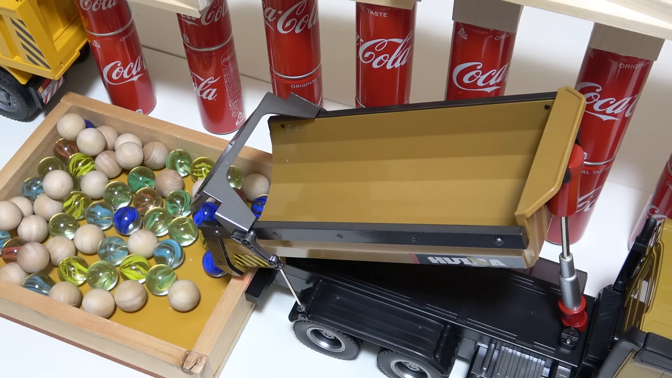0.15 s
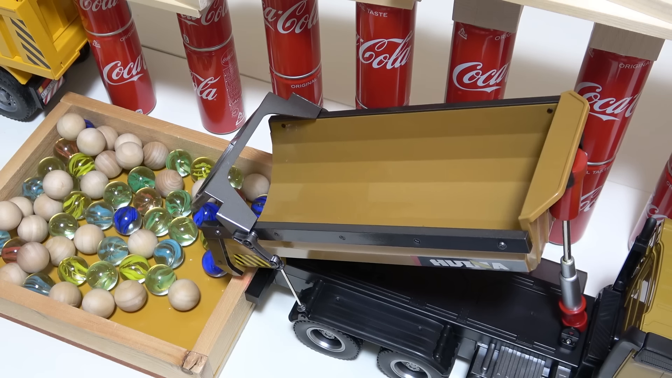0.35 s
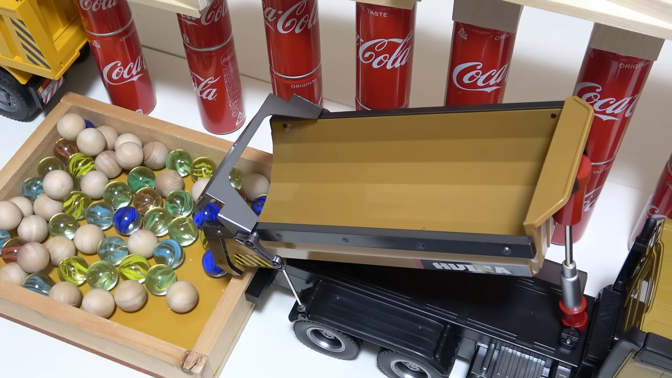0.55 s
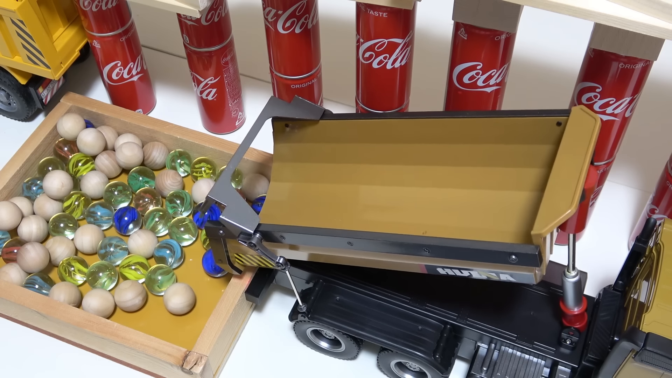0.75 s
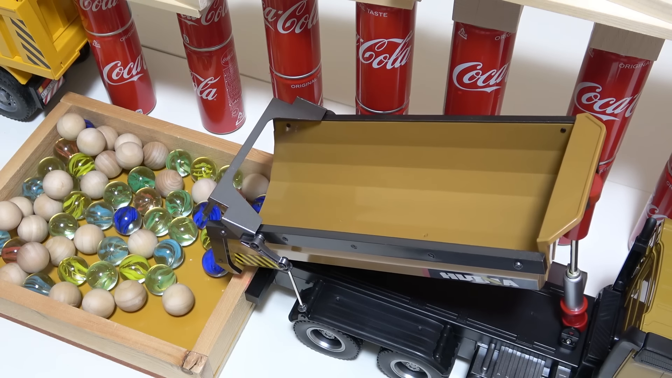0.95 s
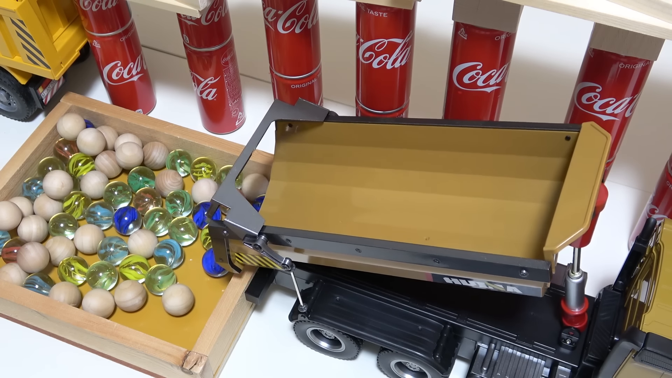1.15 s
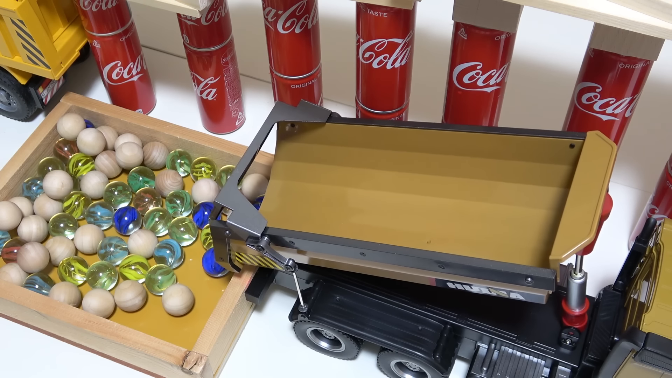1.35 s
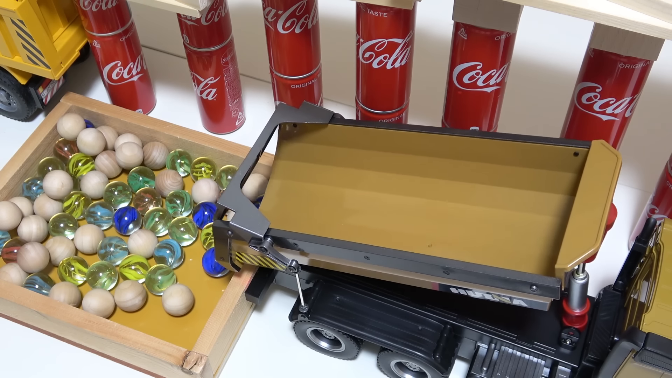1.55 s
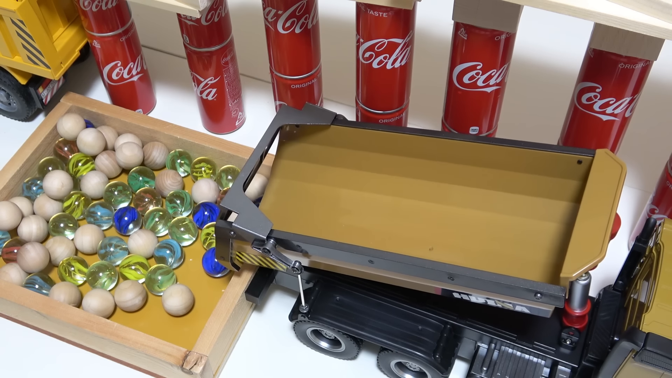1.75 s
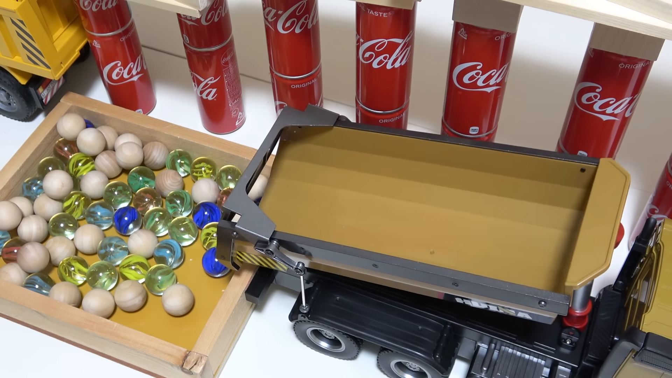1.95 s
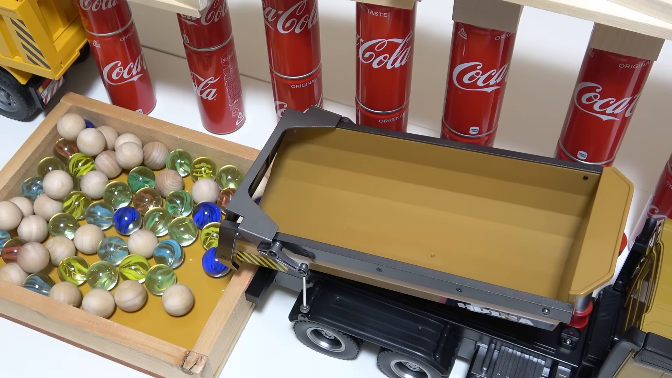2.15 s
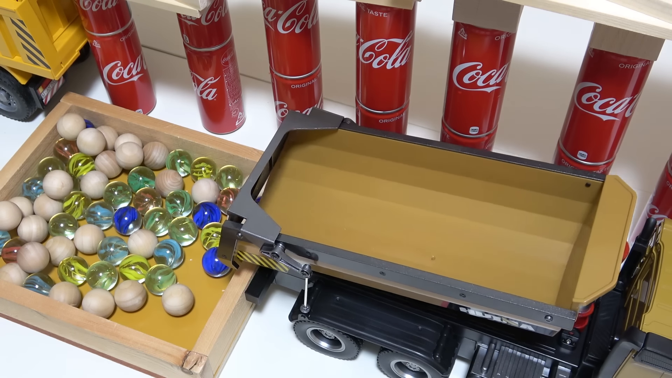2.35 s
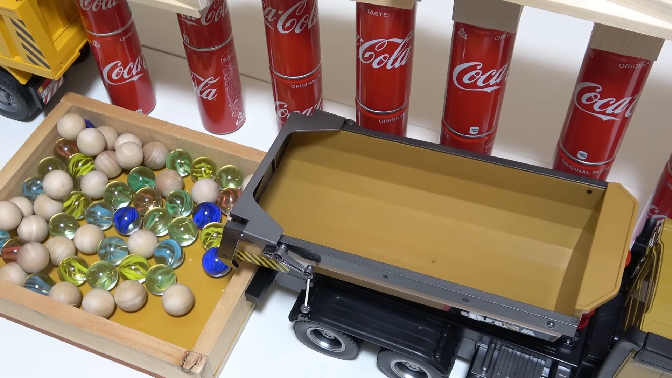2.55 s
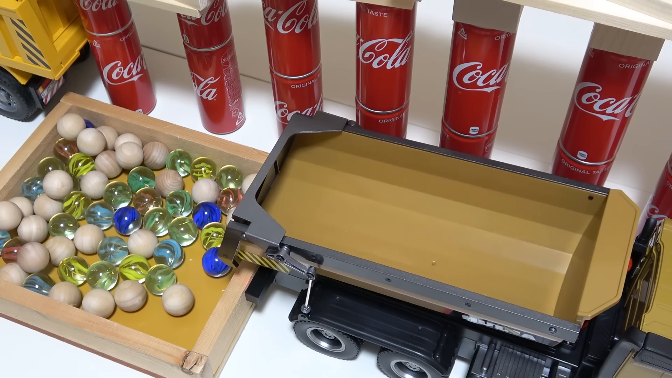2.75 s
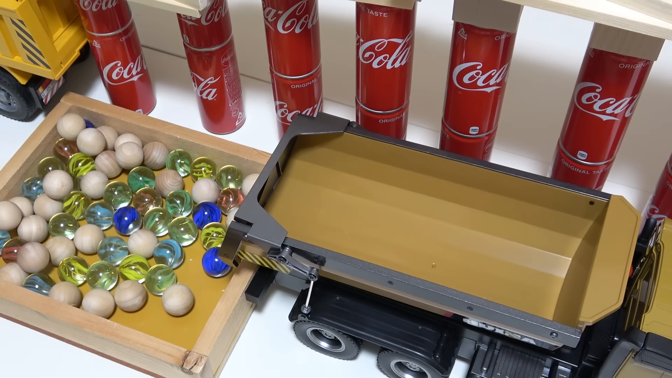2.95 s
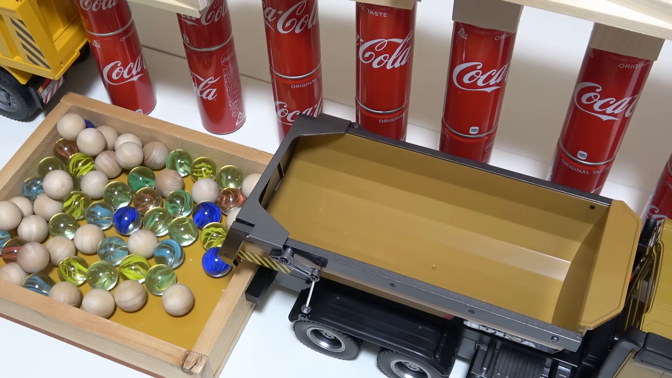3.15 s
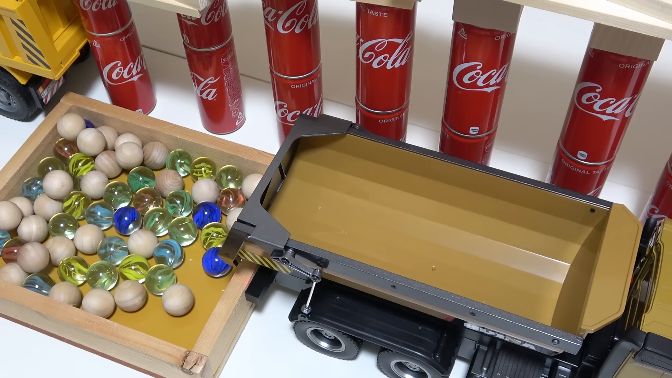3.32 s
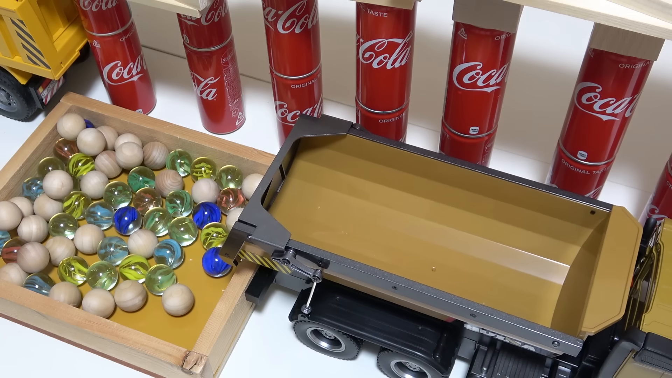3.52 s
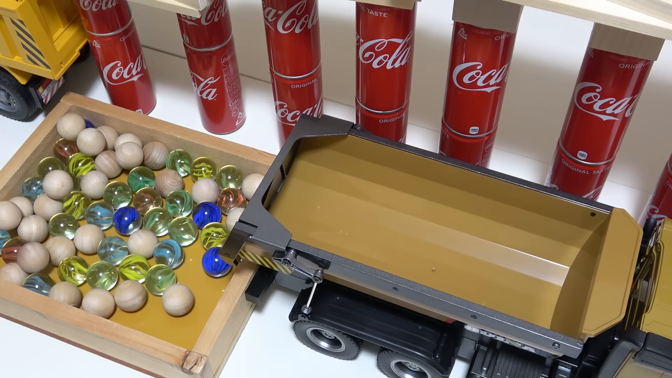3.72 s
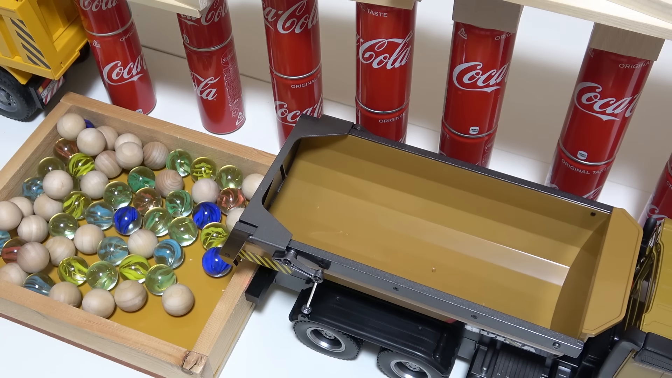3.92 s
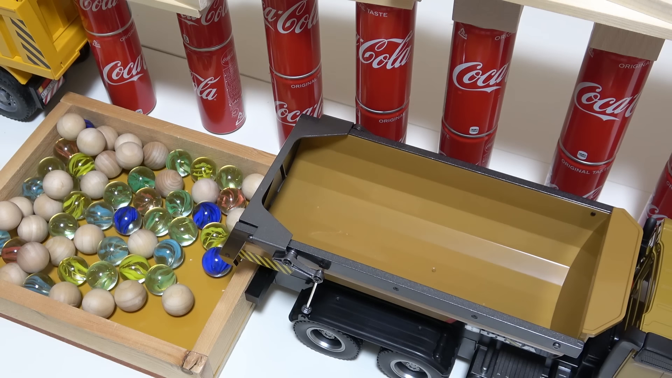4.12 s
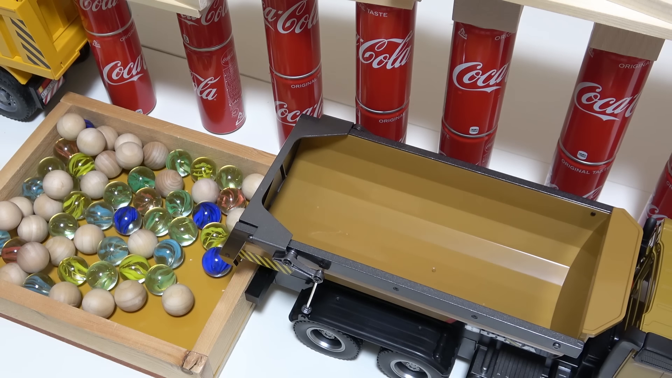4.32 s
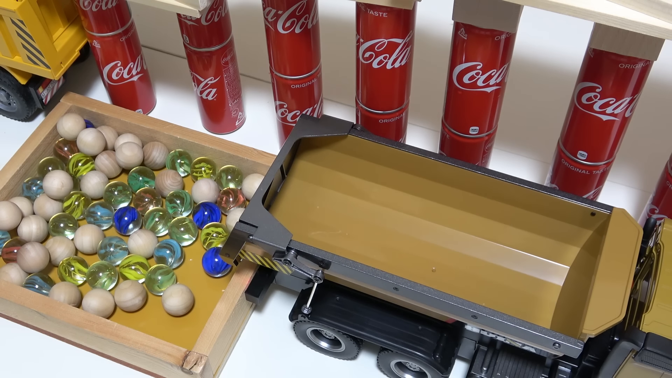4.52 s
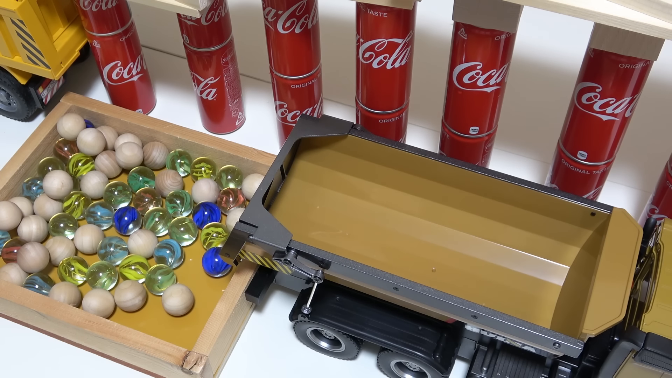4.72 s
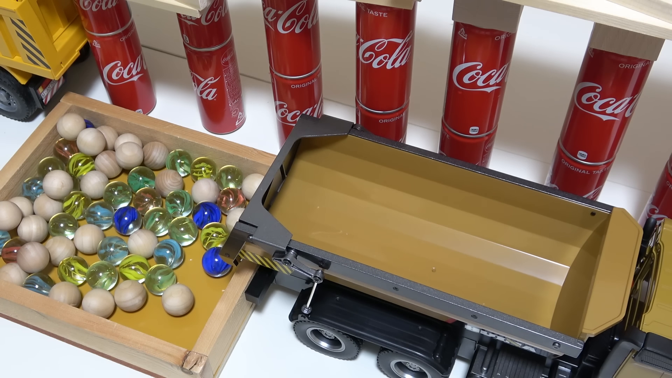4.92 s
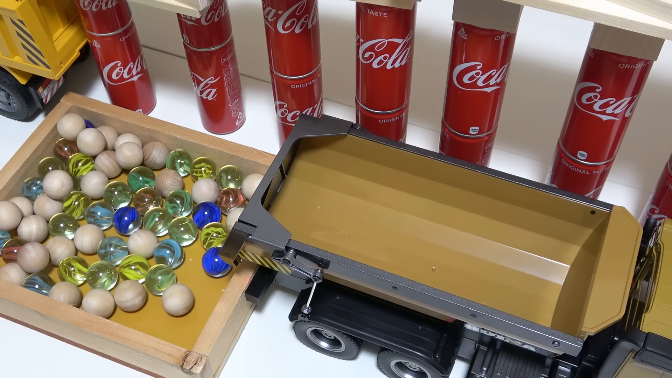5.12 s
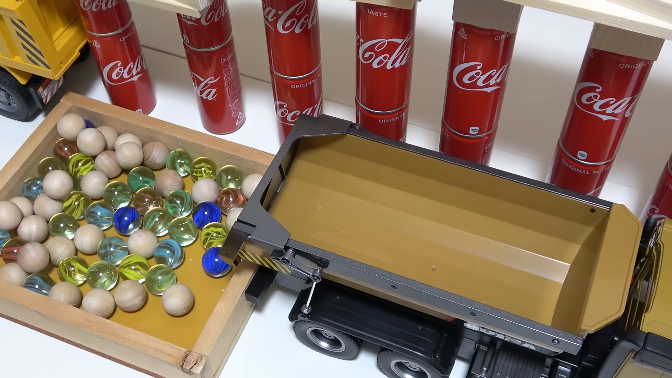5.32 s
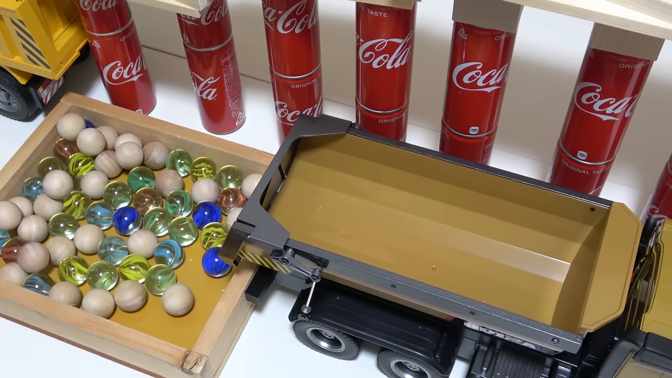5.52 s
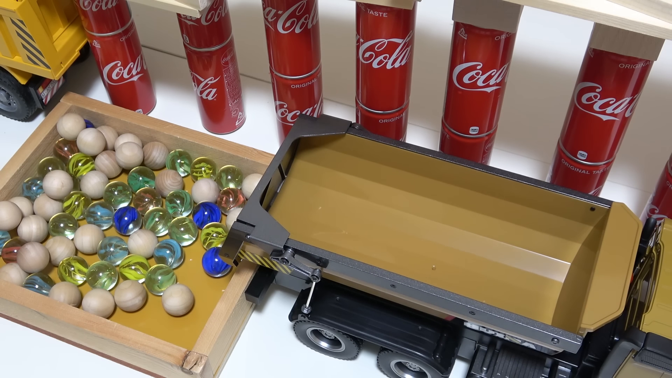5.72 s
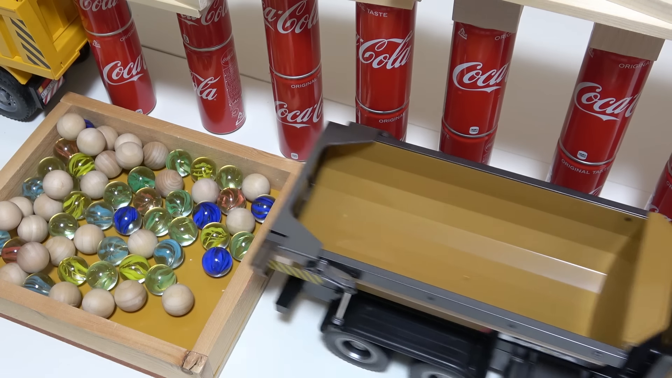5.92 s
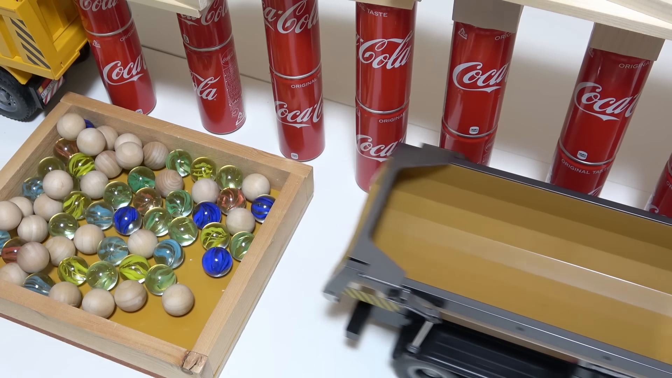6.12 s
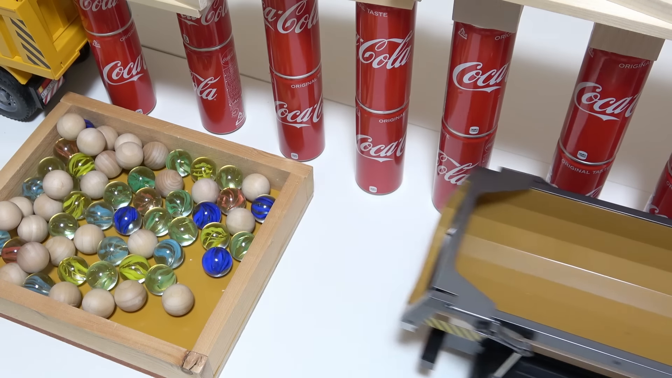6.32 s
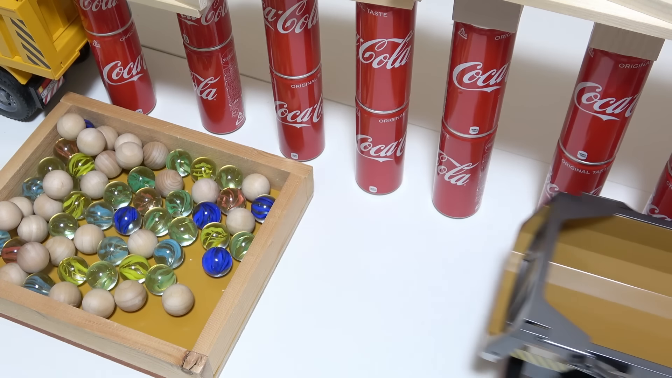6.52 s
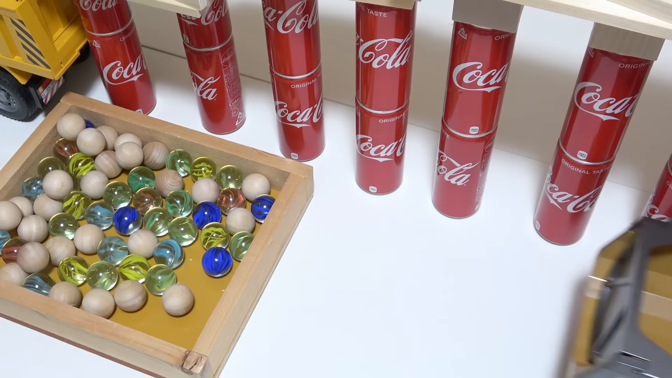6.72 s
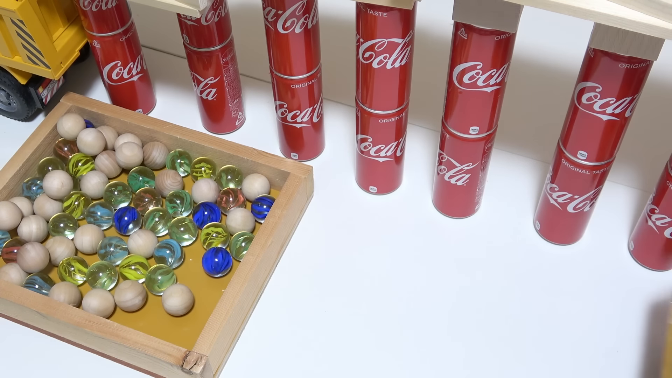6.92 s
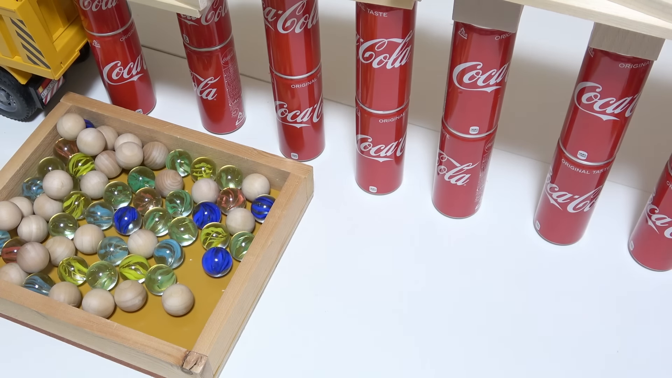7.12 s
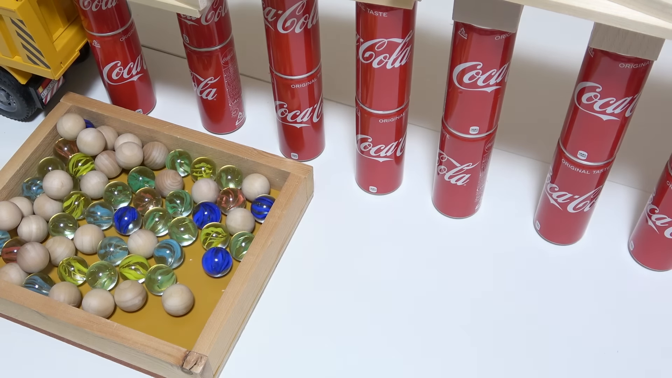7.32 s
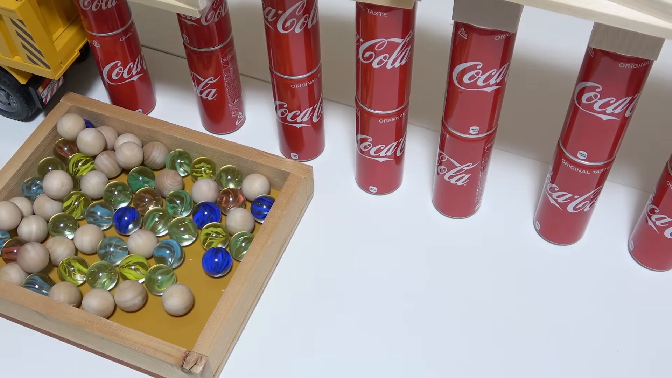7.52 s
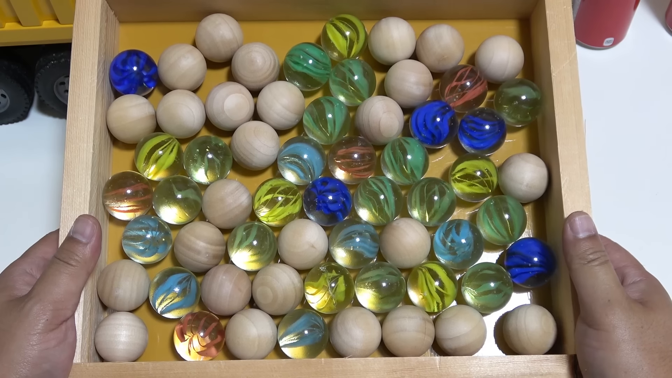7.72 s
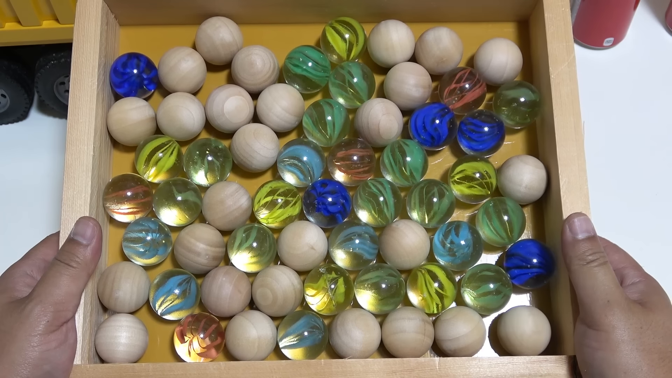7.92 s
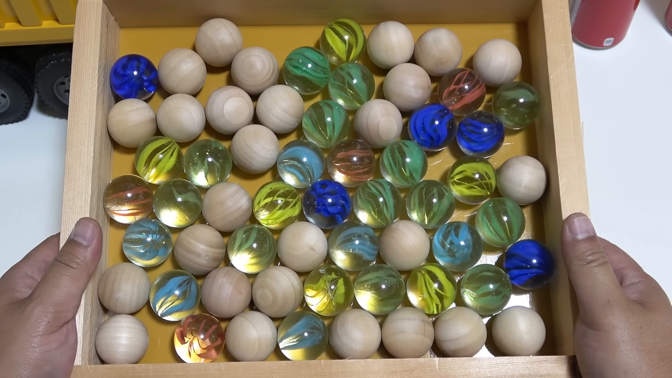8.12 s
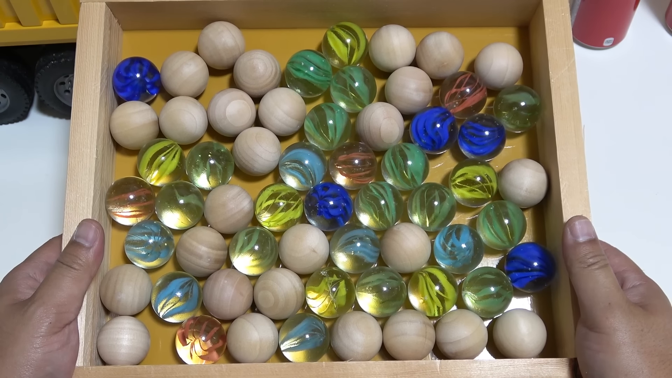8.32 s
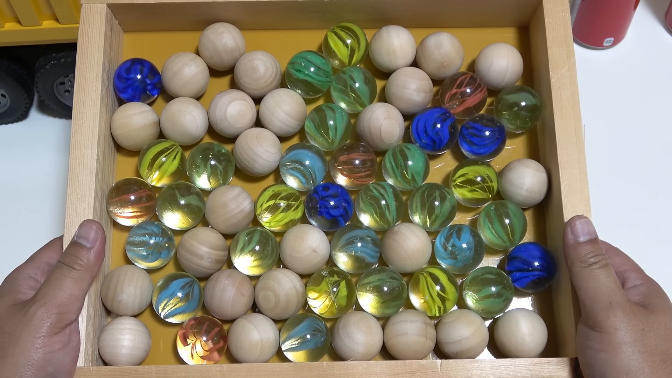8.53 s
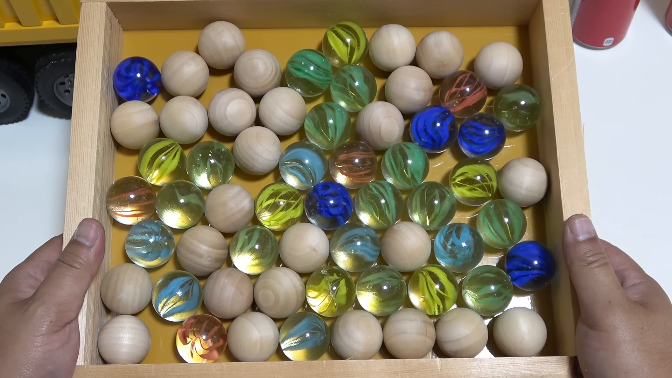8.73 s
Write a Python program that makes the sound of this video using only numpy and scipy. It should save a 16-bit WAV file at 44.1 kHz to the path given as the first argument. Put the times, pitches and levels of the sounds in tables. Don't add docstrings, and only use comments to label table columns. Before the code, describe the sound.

In a quiet room, wooden and glass balls settle with a few quick taps before an abrupt cut to a toy truck's lift motor. It whines steadily with gear hiss, the bed creaks and lands softly, and the motor coasts down. A harsher drive motor spins up, rattles away and ends in a clattering bump. Another cut leaves faint room hum. Close microphone, short echo.

```python
import sys
import numpy as np
from scipy import signal
from scipy.fft import rfft, irfft, next_fast_len
from scipy.io import wavfile
from scipy.ndimage import uniform_filter1d

SR = 44100
rng = np.random.default_rng(int(sys.argv[2]) if len(sys.argv) > 2 else 0)


def wav_out(sig):
    wavfile.write(sys.argv[1], SR, np.round(np.clip(np.atleast_2d(sig).T, -1, 1) * 32767).astype(np.int16))


def ratio(d):
    e = np.asarray(d, float) / 20
    return 10 ** e


N = 386316
T = np.arange(N) / SR

TRUCK_S, QUIET_S = 0.168, 7.608
OFF_S, COAST_S = 5.329, 0.51


def evened(x):
    return x / np.sqrt(np.mean(x ** 2) + 1e-20)


def read(points, hz):
    f, value = np.transpose(points)
    return np.interp(np.log(hz + 1), np.log(f + 1), value)


def play(rows):
    s, *columns = np.transpose(rows)
    gate = (T >= s[0]) * np.clip((s[-1] - T) / 0.0091, 0, 1)
    return [np.interp(T, s, c) for c in columns] + [gate]


def add(mix, s, sound):
    part = mix[round(s * SR):][:len(sound)]
    part += sound[:len(part)]


def hold(start, end, db, rise, fall):
    return db - rise * np.maximum(start - T, 0) - fall * np.maximum(T - end, 0)


def bell(s, width_s):
    return np.exp(-((T - s) / width_s) ** 2)


def travelled(raised_db, down_db, swell_db=0, at=0):
    travel = np.linspace(0, 1, 200)
    swell = np.exp(-((travel - at) / 0.14) ** 2)
    db = raised_db + (down_db - raised_db) * travel + swell_db * swell
    return np.interp(T, TRUCK_S + travel * (OFF_S - TRUCK_S), db)


def wander(per_s):
    knots = rng.standard_normal(int(N / SR * 40) + 2)
    smooth = signal.butter(2, np.clip(per_s, .1, 19), fs=40, output="sos")
    knots = evened(signal.sosfiltfilt(smooth, knots))
    return np.interp(T * 40, np.arange(len(knots)), np.clip(knots, -2, 2))


def lowpass(x, steepness, hz):
    return signal.sosfilt(signal.butter(steepness, hz, fs=SR, output="sos"), x)


def bandpass(x, low_hz, high_hz):
    return signal.sosfilt(signal.butter(2, [low_hz, high_hz], "band", fs=SR, output="sos"), x)


def colour(x, body, rings=()):
    hz = np.fft.rfftfreq(next_fast_len(N), 1 / SR)
    db = read(body, hz) + sum(d / (1 + (2 * (hz - f) / w) ** 2) for f, w, d in rings)
    return evened(irfft(rfft(x, next_fast_len(N)) * ratio(db))[:N])


def resonate(x, hz, width):
    r = np.exp(-np.pi * width / SR)
    return 2 * signal.lfilter([1 - r], [1, -r * np.exp(2j * np.pi * hz / SR)], x + 0j).real


def resonate_twice(x, hz, width):
    return evened(resonate(resonate(x, hz, width), hz, width))


def ring(db, hz, t60):
    t = T[:SR // 2]
    return ratio(db - 60 * t / t60) * np.sin(2 * np.pi * hz * t) * np.minimum(t / 0.0017, 1)


def scrape(turns, lasts_s):
    surface = irfft(rfft(rng.standard_normal((120, 256))), 4096)
    wear = np.clip(T / lasts_s, 0, 118)
    old, place = wear.astype(int), (turns % 1 * 4096).astype(int)
    blend = wear % 1 * np.pi / 2
    return evened(np.cos(blend) * surface[old, place] + np.sin(blend) * surface[old + 1, place])


def order(turns, k, db, loose=1):
    return np.sqrt(2) * ratio(db) * np.cos(2 * np.pi * (k * turns + loose * rng.random()))


# (pitch [Hz], level [dB per Hz])
FLOOR = [(15, -38.5), (25, -12.5), (59, -10.5), (91, -17), (123, 2), (150, -18), (330, -17), (410, -10),
         (950, -13), (1180, -21), (1620, -23.5), (1800, -29), (3500, -35), (6500, -33.5), (15800, -38)]
# (pitch [Hz], width [Hz], level [dB])
HUMS = [(118, 11, -66.5), (417.3, 28, -68.5), (1000, 41, -65)]


def quiet_room():
    wash = colour(rng.standard_normal(N), FLOOR)
    wash = wash + 0.65 * np.array([colour(v, FLOOR) for v in rng.standard_normal((2, N))])
    out = ratio(-58) * wash
    for f, w, db in HUMS:
        unsteady = evened(resonate(rng.standard_normal(N), f, w))
        out += ratio(db) * evened(0.32 * np.cos(2 * np.pi * f * T) + unsteady)
    return out


# (pitch [Hz], time to fall 60 dB [s])
ROOM = [(100, 0.66), (350, 0.37), (2000, 0.22), (10000, 0.19)]


def room_echo(x):
    taps = np.zeros((2, SR))
    at = np.arange(200, SR - 20, 20) + rng.integers(0, 20, (2, (SR - 201) // 20))
    np.put_along_axis(taps, at, rng.choice([-1., 1.], at.shape), 1)
    taps[1] = 0.83 * taps[0] + .5 * taps[1]
    hz, t, z = signal.stft(taps, SR, nperseg=256)
    tail = signal.istft(z * ratio(-60 * t / read(ROOM, hz)[:, None]), SR, nperseg=256)[1]
    return signal.fftconvolve(x[None], tail / np.linalg.norm(tail[0]), axes=1)[:, :N]


# (time [s], level [dB])
ROLL = [
    (0.0, -28.5),
    (0.028, -32.5),
    (0.165, -34.5),
]
# (pitch [Hz], level [dB per Hz])
TRAY = [(18, -52), (30, -17), (80, -5), (180, -13.5), (260, -1.5), (420, -5), (540, -11.5), (680, -7.5),
        (900, -11.5), (2000, -25), (3400, -39), (6800, -64), (8000, -90), (17000, -120)]
# (time [s], peak level [dB], ring pitch [Hz], time to fall 60 dB [s])
BALLS = [(0, -17, 1670, 0.016), (0, -18, 1000, 0.014), (0, -21, 2500, .006), (0.035, -23, 1300, 0.034),
         (.008, -31, 340, .06), (.016, -26, 330, .04), (.063, -29, 400, 0.05), (.085, -27, 400, 0.04),
         (.092, -28, 440, 0.058), (0.113, -31, 430, 0.05), (.14, -31, 400, .06)]


def tray():
    level_db, _ = play(ROLL)
    taps = rng.standard_normal(N) * (1 + 0.59 * (rng.random(N) < 900 / SR))
    wood_rings = [(400, 63, 4.0), (2940, 220, 11.0), (4300, 800, 5), (6200, 500, 6)]  # (Hz, width Hz, dB)
    out = ratio(level_db) * colour(taps, TRAY, wood_rings)
    for s, *mode in BALLS:
        add(out, s, ring(*mode))
    return out


# (time [s], peak level [dB], ring pitch [Hz], time to fall 60 dB [s])
LANDING = [
    (5.183, -25, 375, 0.06),
    (5.2, -31, 390, .08),
    (5.212, -34, 320, .06),
]
# (time [s], length [s],
# level [dB], lowest pitch [Hz], highest pitch [Hz])
CREAKS = [(.9, .15, -53, 180, 231), (1.056, 0.21, -41.5, 200, 797), (2.33, 0.14, -38, 201, 1510),
          (2.374, 0.035, -29.5, 700, 3220), (5.34, .13, -40, 1844, 1885), (5.46, .06, -41, 1390, 1460),
          (5.373, .05, -39, 1000, 1070), (5.177, 0.027, -33.5, 306, 450), (5.29, .14, -49.5, 105, 135),
          (5.868, 0.093, -36, 403, 750), (7.153, 0.065, -34.5, 180.6, 403)]


def creaks():
    out = np.zeros(N)
    for s, *mode in LANDING:
        add(out, s, ring(*mode))
    slips = rng.standard_normal(N) * (1 + (rng.random(N) < 400 / SR) * 6)
    for s, length, db, low_hz, high_hz in CREAKS:
        swell = np.sin(np.pi * np.clip((T - s) / length, 0, 1))
        out += ratio(db) * evened(bandpass(slips, low_hz, high_hz)) * swell
    return out


# (pitch [Hz], level [dB per Hz])
SHELL = [(40, -26), (110, -9.5), (300, -1.5), (800, -5), (1500, -6.5), (3000, -15), (6000, -23.5),
         (15000, -58.5)]
# (time [s], peak level [dB], hardness [dB])
KNOCKS = [(7.284, -7, 1.5), (7.292, -8.5, -0.5), (7.297, -21, 0), (7.306, -16, 3), (7.313, -20, 1.5),
          (7.322, -11, 2.5), (7.332, -14.5, 1.5), (7.345, -7, 1), (7.353, -23.5, 9.5), (7.362, -14.5, 4.5),
          (7.368, -15.5, 4.5), (7.377, -22, 7), (7.395, -22.5, 4.5)]
# (pitch [Hz], level [dB], time to fall 60 dB [s])
BUMP_MODES = [(116.5, -6, 0.3), (260, -7, 0.12), (345, -4, 0.031), (474, -5.5, .04), (710, 10, 0.034),
              (950, -11, 0.017), (1340, 3, 0.023), (2166, 1, 0.014)]


def bump():
    chance = rng.standard_normal((len(KNOCKS), len(BUMP_MODES), 2))
    out = ratio(hold(7.287, 7.375, -22.5, 5000, 298)) * colour(rng.standard_normal(N), SHELL)
    for (s, db, hard_db), draw in zip(KNOCKS, chance):
        for (f, d, t60), (louder, higher) in zip(BUMP_MODES, draw):
            add(out, s, ring(db - 14 + d + 1.5 * louder, f * (1 + .08 * higher), t60))
        crack = signal.lfilter([.25], [1, -1.1, .3], rng.standard_normal(2000))
        add(out, s, ratio(db - 9.0 + hard_db - 60 * T[:2000] / 0.056) * crack)
    add(out, 7.288, ring(db=-20, hz=119.8, t60=.22))
    return out


# (time [s], width [s], level [dB])
PASSING = [(6.46, .04, -36), (6.85, 0.104, -30.5), (7.06, 0.071, -30.5), (4.1, .03, -32), (5, 0.037, -32.5),
           (7.4, 0.07, -34.5), (6.89, 0.036, -37), (7.02, 0.04, -35), (7.8, .06, -33), (6.25, .04, -33),
           (6.7, .09, -30.5), (7.17, .06, -31), (6.53, .04, -32.5), (6.95, .04, -32), (5.3, .07, -30.5),
           (8.6, 0.052, -36.5), (7.23, .05, -39.5), (6.32, 0.062, -40), (3.9, .06, -30), (6.81, 0.049, -34),
           (7.02, 0.036, -29.5), (6.54, 0.034, -38), (5.2, 0.0505, -35.5), (6.11, .04, -32.5),
           (6.3, 0.036, -30)]
PASSING_ORDERS = (12, 12, 12, 12, 12, 12, 15, 15, 15, 18, 18, 18, 18, 18, 21, 21, 21, 24, 26, 26, 26, 28,
                  28, 14.3, 14.3)
# (time [s], peak level [dB])
SKIPS = [(5.9773, -10), (6.0034, -11.5), (6.0274, -10), (6.0374, -10.5), (6.0494, -16.5), (6.1124, -11)]


def drive_whines(turns, uneven):
    tones = np.zeros(N)
    for k, db, rough in zip((18, 12, 3), (-45, -43, -55), uneven):
        tones += order(turns, k, db + 2.5 * wander(6)) * (1 + .5 * rough)
    tones += order(turns, 3, hold(7.12, 7.12, -37, 70, 110))
    for k in sorted(set(PASSING_ORDERS)):
        level = sum(ratio(db) * bell(s, w) for j, (s, w, db) in zip(PASSING_ORDERS, PASSING) if j == k)
        throb = 1 + 0.27 * uneven[int(k) % 3] + 0.3 * np.cos(2 * np.pi * turns)
        tones += level * order(turns, k, 0) * throb
    for s, db in SKIPS:
        add(tones, s, ring(db + 2.0, 2250, .009) + ring(db - 21.0, 3600, .006))
    return tones


STRANDS = (15, 20, 26)
STRANDS_DB = (-12, -11, -10)
# (pitch [Hz], width [Hz], level [dB])
STRAIN_RINGS = [(1680, 120, 8), (2050, 60, 10), (2270, 110, 7), (2620, 120, 4), (2900, 100, 7)]
# (time [s], share added [-])
BITES = [(5.861, 1.5), (5.867, 1.5), (5.873, 1.5), (5.885, .8), (5.899, 2), (5.91, 2.4), (5.9165, 1.4),
         (5.927, .3), (5.937, 1.2), (5.945, .8), (5.952, 2), (5.96, 1), (5.966, .8), (5.98, 2.4),
         (5.992, 1.6), (6.004, 1.4), (6.019, 1), (6.028, 1.4), (6.038, 2), (6.046, 1), (6.052, 1.2),
         (6.06, 1.2), (6.068, 1.6), (6.08, 1.3), (6.095, 1.3), (6.112, 1.5), (6.125, 1.3), (6.14, 1.5),
         (6.152, 1.3)]


def drive_strain(turns, uneven, strain_db):
    chatter = uniform_filter1d(uniform_filter1d(rng.standard_normal(N), 50), 50)
    mesh = order(turns, 18, 0)
    for k, db, rough in zip(STRANDS, STRANDS_DB, uneven):
        mesh += order(turns, k, db) * (1 + rough)
    strain = colour(mesh * (1 + .6 * evened(chatter)), [(100, 0.0017), (9000, 0.0026)], STRAIN_RINGS)
    strain = strain / np.sqrt(uniform_filter1d(strain ** 2, 600) + 1e-9)
    bites = sum(share * bell(s, .0035) for s, share in BITES)
    return ratio(strain_db) * strain * (.35 + .5 * bites)


# (pitch [Hz], level [dB per Hz])
DRIVE_BODY = [(53, -50.5), (90, -30.5), (240, -10), (400, -15), (800, -10), (1100, -1.5), (2000, -3),
              (3100, -5.5), (3700, -5), (4600, -7.5), (5100, -10.5), (8500, -16), (14300, -31),
              (15500, -49)]
# (pitch [Hz], width [Hz], level [dB])
DRIVE_RINGS = [(810, 50, 5), (1135, 80, 6), (1660, 70, 4), (1950, 70, 6), (2350, 60, 4), (2470, 100, 6),
               (2720, 70, 3), (2930, 70, 4), (3420, 60, 7), (3890, 60, 4), (4260, 130, 8), (4590, 160, 8.5),
               (5350, 150, 2), (8250, 300, 4)]
# (pitch [Hz], width [Hz], time [s], width [s], share added [-])
PANELS = [(5350, 246, 6.0, 0.14, 1.2), (5400, 230, 6.68, .06, 0.68), (8600, 130, 6.05, .08, 0.79),
          (8400, 250, 5.1, .07, 1.6), (8200, 150, 8.2, .06, 1.2), (8200, 150, 7.02, 0.054, 1.3),
          (8000, 150, 7.21, .06, 1.1), (7400, 200, 12, 0.047, 1.2), (6760, 300, 5.9, .05, 0.29),
          (4500, 640, 5.93, 0.12, -0.62), (2900, 250, 5.9, 0.045, 0.35), (2280, 400, 6.15, .08, 0.49),
          (2780, 300, 6.93, 0.099, 0.83), (1500, 500, 7.15, .12, -0.52), (1300, 200, 5.8, 0.101, .6),
          (4600, 200, 6.98, .04, 0.25), (3970, 100, 5.9, .05, 0.49)]


def drive_rattle(turns, tread):
    knocking = 1 + 3.2 * (rng.random(N) < 600 / SR)
    rattle = rng.standard_normal(N) * knocking + 0.45 * scrape(turns, .08)
    rattle = rattle * (1 + 0.16 * tread) * ratio(0.5 * wander(6.2))
    gears = colour(rattle, DRIVE_BODY, DRIVE_RINGS)
    gears = gears + .25 * bandpass(gears, 3900, 4800) * wander(18)
    return gears + sum(share * bell(s, w) * resonate(gears, f, wide) for f, wide, s, w, share in PANELS)


# (time [s], shaft speed [Hz], strain level [dB])
DRIVE = [(5.85, 78, -46), (5.872, 92, -25), (5.885, 110, -19), (5.905, 113.3, -18), (5.925, 113.5, -22),
         (5.955, 114, -18.5), (5.985, 120, -18.5), (6.02, 127, -22), (6.045, 146, -24), (6.075, 158, -27),
         (6.15, 161, -28.5), (6.17, 161.5, -38), (6.3, 162, -46), (7.28, 163.5, -70)]
# (time [s], level [dB])
SEAMS = [
    (6.11, -57.5),
    (6.4, -48),
    (6.56, -54.5),
    (7.06, -55.5),
    (7.29, -47.5),
]


def drive():
    hz, strain_db, on = play(DRIVE)
    run_db = -23.5
    gear_db = hold(5.89, 7.32, run_db, 499.5, 188)
    turns = np.cumsum(hz * (1 + 0.003005 * wander(17.87))) / SR
    uneven = evened(uniform_filter1d(rng.standard_normal((3, N)), 700, axis=1))
    tones = drive_whines(turns, uneven) + drive_strain(turns, uneven, strain_db)
    tread_hz = 66 * hz / 163 * (1 + 0.038 * wander(10.0))
    tread = np.cos(2 * np.pi * np.cumsum(tread_hz) / SR)
    switched_on = np.clip((T - 5.853) / 0.015, 0, 1)
    gears = ratio(gear_db + 1) * switched_on * drive_rattle(turns, tread)
    tyre = ratio(-57.5) + sum(ratio(db) * bell(s, 0.037) for s, db in SEAMS)
    return on * tones + gears + ratio(gear_db - run_db - 1.0) * tyre * tread * (hz / 163) ** 6


LIFT_ORDERS = (1, 2, 3, 4, 5, 6, 7, 8, 9, 10, 11, 12, 14, 16, 18, 21, 24, 20, 13, 15, 17, 19, 22, 23, 25,
               27, 30, 31, 26, 10.77)
# (raised level [dB], down level [dB], swell [dB], swell at travel [0-1])
ORDER_LEVELS = [(-58, -69, 2.5, 0.62), (-48.5, -47.5, -6.5, 0), (-54, -44.5, 7, 0.42),
                (-42, -41.5, -3.5, 0.51), (-33, -30.5, 3.5, 0.48), (-46.5, -54.5, 11, 0.59),
                (-72, -47, -20, 0.26), (-38, -42, 4, 0.64), (-32.5, -32.5, -4, 0), (-49, -42.5, -4, 0.53),
                (-53, -48, 7.5, 0.42), (-50.5, -48, 5, 1), (-62, -48.5, 9, 0.64), (-47, -48, -25, 0.36),
                (-56.5, -47.5, 8.5, 0.63), (-47.5, -52.5, 0.5, 0.57), (-51.5, -48, 12, 0.7),
                (-39, -64, -12, 0.54), (-64, -63, -8, 0), (-42.5, -49.5, -14, 0.4), (-57, -47, -8, 0.24),
                (-48.5, -57.5, 8.5, 0.39), (-47, -54, -18, 0.4), (-48, -56, -8, 0.5), (-50, -72, -29, .5),
                (-49, -59, -4, 0.66), (-52, -59, -1, .45), (-53, -54, -19, 0.46), (-71, -63, -18, 0.3),
                (-43.5, -56, 6, 0.24)]
# (time [s], width [s], level [dB])
TUNED = [(3.336, 0.19, 3.5), (4.35, 0.22, 2.5), (3.2, .2, 3.5), (2.87, .15, 3), (4.6, .1, -5.5),
         (4.5, 0.2, 0.5), (0.93, 0.3, 6), (4.67, 0.21, 6), (3.66, 0.23, -0.5), (5.7, .2, 4), (.8, .2, 4),
         (2.83, 0.24, 4.5), (2.7, .2, 5), (0.59, .2, 9), (1.1, 0.16, 9), (3.5, 0.13, 6), (1.3, .3, 2),
         (4.5, .3, 7), (4.5, 0.37, 8), (1.9, .4, 3), (3.96, 0.15, 0), (2.4, .4, -4), (4.7, 0.21, -8)]
TUNED_ORDERS = (5, 5, 24, 24, 24, 9, 8, 24, 24, 10, 10, 21, 14, 12, 12, 12, 26, 26, 22, 22, 18, 16, 11)


def lift_tones(turns, slow_db):
    idle_db = -12 * np.exp(-abs(T - TRUCK_S) / 0.43)
    tones = np.zeros(N)
    for k, row in zip(LIFT_ORDERS, ORDER_LEVELS):
        db = travelled(*row) + (k > 4.5) * idle_db + (1.12 + 0.06 * k) * wander(21.0)
        db = db + sum(d * bell(s, w) for j, (s, w, d) in zip(TUNED_ORDERS, TUNED) if j == k)
        tones += order(turns + (k == 3) / 12, k, db, loose=k > 9.5)
    return ratio(4.7 * slow_db + hold(0, OFF_S - .03, 0, 0, 110)) * tones


# (pitch [Hz], level [dB per Hz])
BRUSH_BODY = [(2000, -69), (4500, -24.5), (7000, -18.5), (9000, -9.5), (11500, -16.5), (12200, -34),
              (13500, -26), (15800, -31.5)]
# (pitch [Hz], width [Hz], level [dB])
BRUSH_RINGS = [(7470, 180, 12.5), (8880, 476, 7.5), (10240, 610, 7.5), (11600, 180, -19), (12500, 370, 7.5),
               (14200, 230, -2)]
CAN_ORDERS = (67, 68, 69, 70, 71, 72, 73)
# (pitch [Hz], width [Hz], level over brushes [dB], at travel [0-1])
CAN_SWELLS = [(9120, 100, -6, .1), (9236, 230, -0.5, 0.41), (10080, 400, -13.5, 0.23),
              (11030, 450, -14.5, 0.43), (14100, 400, -21.5, .36), (13200, 400, -19, 0.23),
              (12670, 450, -15.5, 0.5), (13000, 600, -15, .85)]
# (pitch [Hz], width [Hz], level [dB])
HOUSING = [(235, 13, -11.5), (693, 52, 2.5), (1913, 23, -9)]


def lift_brushes(turns, slow_db):
    brush_db = travelled(-41.5, -43, -5, -1.55) + 1.2 * slow_db
    near, aside = scrape(turns, .09), scrape(turns, 0.58)
    brushes = []
    for side in (1, -1):
        rubbing = near + side * 0.29 * aside + 0.56 * rng.standard_normal(N)
        brushes.append(colour(rubbing, BRUSH_BODY, BRUSH_RINGS))
    ticks = sum(order(turns, k, 3 * wander(19)) for k in CAN_ORDERS)
    rings = ratio(brush_db + 4 * slow_db - 7.5) * resonate_twice(ticks, 9280, 500)
    slack = rng.standard_normal(N)
    housing = sum(ratio(db) * resonate_twice(slack, f, w) for f, w, db in HOUSING)
    rings += ratio(hold(5.5, 5.5, -35.5, 63, 30.5) + slow_db) * housing
    for f, w, db, at in CAN_SWELLS:
        level_db = brush_db + travelled(db - 12.5, db - 14, 13.4, at)
        rings += ratio(level_db) * resonate_twice(near + .5 * slack, f, w)
    return rings + ratio(brush_db - 6.5) * np.array(brushes)


# (pitch [Hz], level [dB per Hz])
LIFT_BODY = [(35, -62.5), (60, -64), (200, -35), (330, -27), (600, -13), (900, -18.5), (1250, -10.5),
             (2500, -13), (4050, -16), (4300, -19.5), (6000, -21), (8000, -25.5), (11000, -33.5),
             (15800, -40.5)]
# (pitch [Hz], width [Hz], level [dB])
LIFT_RINGS = [(745, 200, 4.5), (1097, 274, 5.5), (1454, 130, 5.5), (2007, 97, 3.5), (2170, 59, 6),
              (2900, 99, 5.5), (3870, 84, 5)]


def lift_gears(turns, speed, slow_db):
    gear_db = travelled(-35.5, -31) + 0.98 * slow_db
    teeth = (rng.standard_normal(N) + .3 * scrape(turns, .1)) * ratio(.7 * wander(15))
    empty = bell(TRUCK_S, 0.35)
    noise = empty * colour(teeth, LIFT_BODY) + (1 - empty) * colour(teeth, LIFT_BODY, LIFT_RINGS)
    noise = ratio(gear_db + 2.5) * noise
    throb = 1 + 0.14 * np.cos(2 * np.pi * turns) + 0.059 * np.cos(6 * np.pi * turns)
    shade = ratio(-1.5 * bell(2.88, 1))
    dull = lowpass(noise, 2, 2000)
    noise = throb * dull + (noise - dull) * speed ** 0.14 * shade
    soft = lowpass(noise, 4, 10000)
    return soft + (noise - soft) * speed ** 3.1


# (time [s], shaft speed [Hz])
LIFT = [(0.17, 127.6), (0.2, 130.5), (0.41, 130.2), (1.0, 131.7), (2.17, 133.3), (2.19, 133.6),
        (3.93, 132.5), (4.02, 132.4), (4.12, 132), (4.15, 132), (4.47, 131.9), (4.53, 132.9), (5.13, 132.1),
        (5.33, 130.8)]


def lift():
    speed = np.cos(np.pi / 2 * np.clip((T - OFF_S) / COAST_S, 0, 1)) ** 2 + 1e-4
    slow_db = 20 * np.log10(speed)
    hz = play(LIFT)[0] * speed
    turns = np.cumsum(hz * (1 + 0.0011 * wander(19))) / SR
    hum = lift_tones(turns, slow_db) + lift_brushes(turns, slow_db)
    return lift_gears(turns, speed, slow_db), hum


# (pitch [Hz], left over right [dB])
LEAN = [(60, 4.5), (110, -11.5), (200, -3), (380, -11.5), (700, -5), (1300, -5), (4400, -3.5), (9000, -5.5),
        (15000, -3)]


def ports(x):
    half = ratio(read(LEAN, np.fft.rfftfreq(next_fast_len(N), 1 / SR)) / 2)
    return irfft(rfft(x, next_fast_len(N)) * np.array([half, 1 / half]))[:, :N]


# (time [s], left over right [dB])
AWAY = [(0.17, -2.2), (0.75, -2.5), (1.3, -1.5), (2.46, -0.5), (3.5, -1.5), (5.82, -2), (6.87, -3.5),
        (7.6, -5)]


def scene():
    gears, hum = lift()
    truck, knocks = gears + creaks() + drive(), bump()
    lean = ratio(np.array([[.5], [-.5]]) * (play(AWAY)[0] + 5.5))
    treble = np.diff(truck + hum.mean(0) + knocks, prepend=0)
    tins = 0.15 * np.roll(treble, round(0.0036 * SR)) * np.array([[1], [-1]])
    echo = room_echo(ratio(-7) * truck + ratio(-11.5) * knocks)
    middle = ports((tins + truck + hum + knocks + echo) * lean)
    quiet = quiet_room()
    fade = np.clip((QUIET_S - T) / 0.085, 0, 1)
    middle = (middle + ratio(0.5) * quiet) * fade * (T >= TRUCK_S)
    return tray() * (T < TRUCK_S) + middle + quiet * (T >= QUIET_S)


def band_limit(x):
    return signal.sosfilt(signal.butter(12, 15800, fs=SR, output="sos"), x)


def record(dry):
    hz = np.fft.rfftfreq(next_fast_len(N), 1 / SR)
    z = rfft(dry, next_fast_len(N))
    z = z.mean(0) + (z - z.mean(0)) / (1 + (90 / (hz + 1)) ** 2)
    z = z * (hz < 15900) / (1 + (22 / (hz + 1)) ** 4)
    return band_limit(irfft(z)[:, :N])


dry = scene()
out = record(dry)
wav_out(out)
```